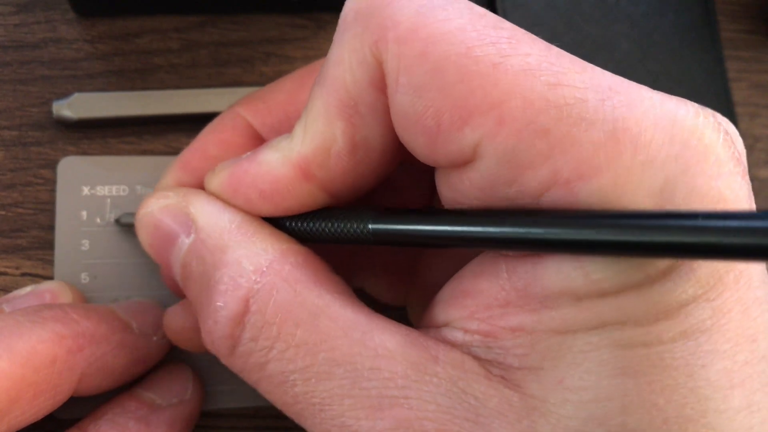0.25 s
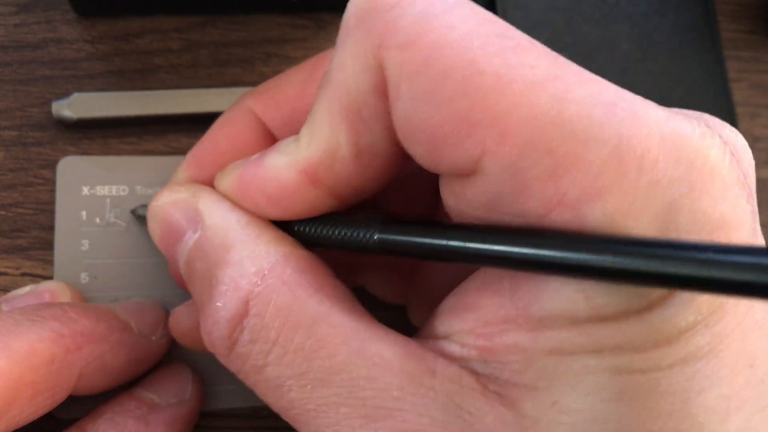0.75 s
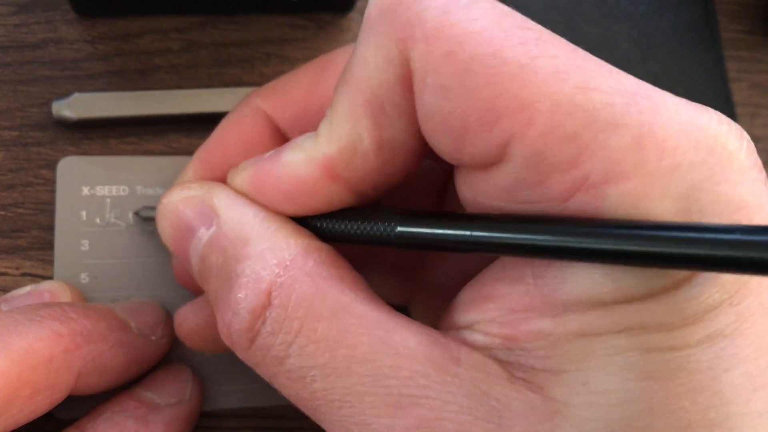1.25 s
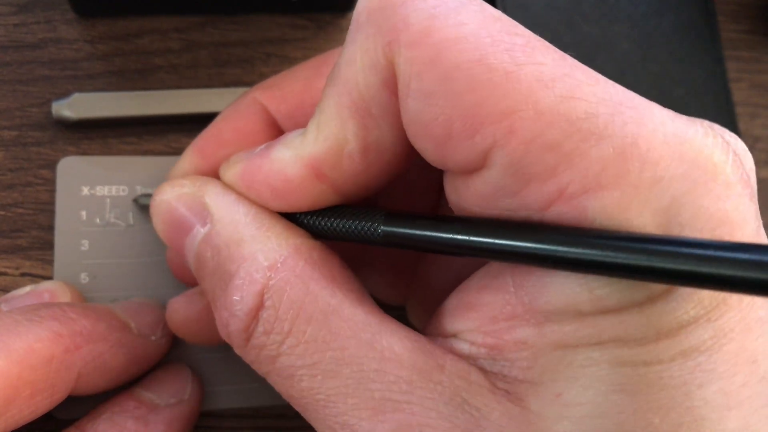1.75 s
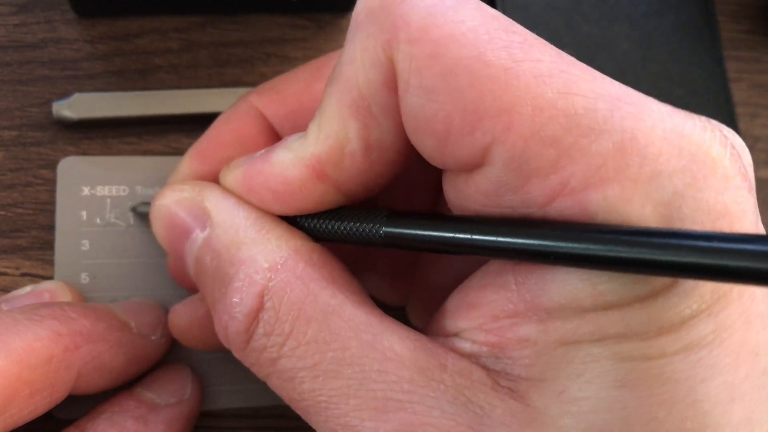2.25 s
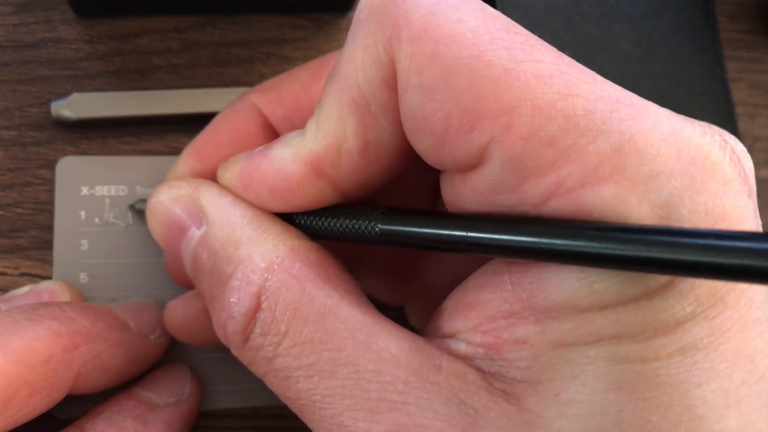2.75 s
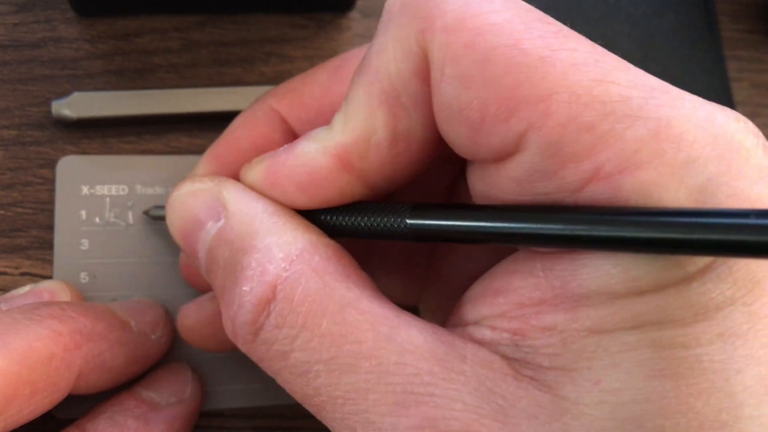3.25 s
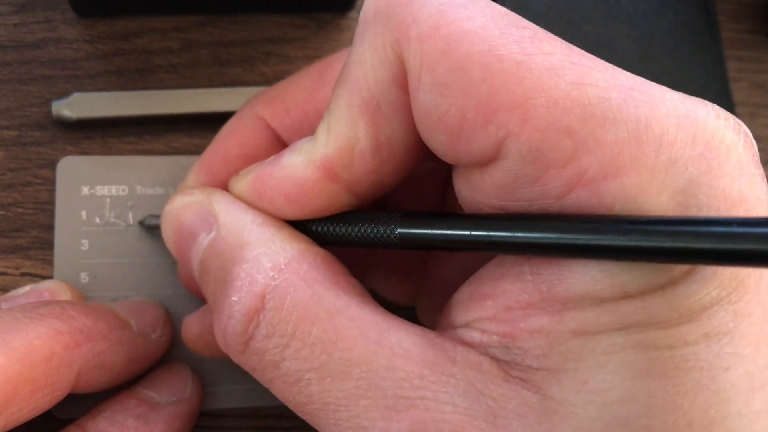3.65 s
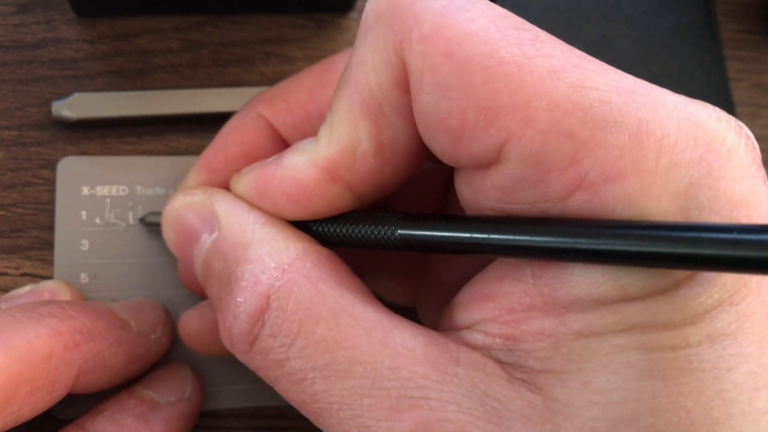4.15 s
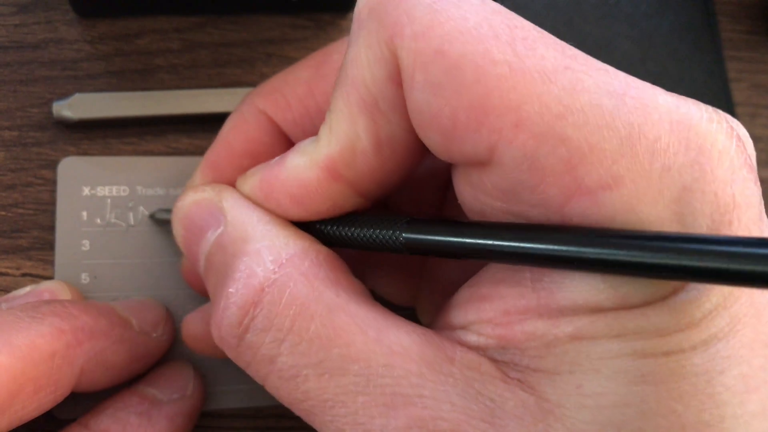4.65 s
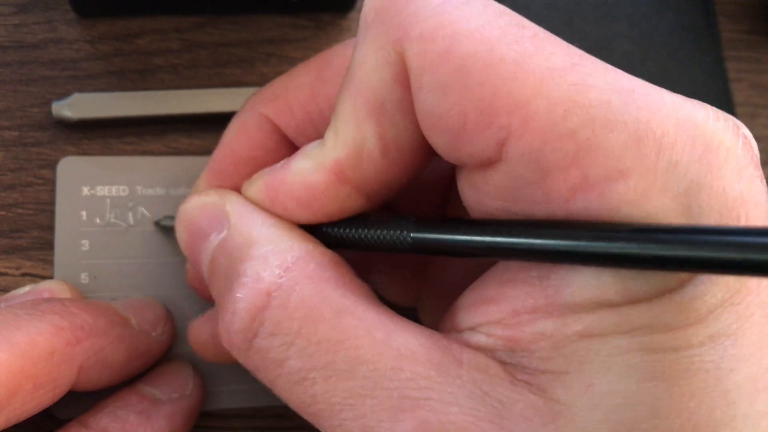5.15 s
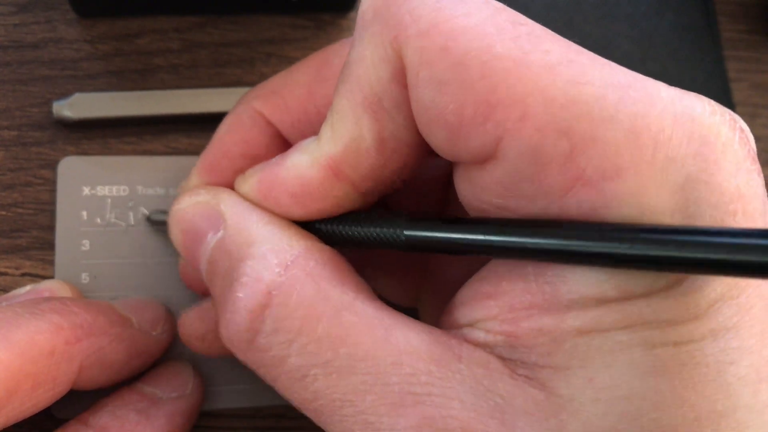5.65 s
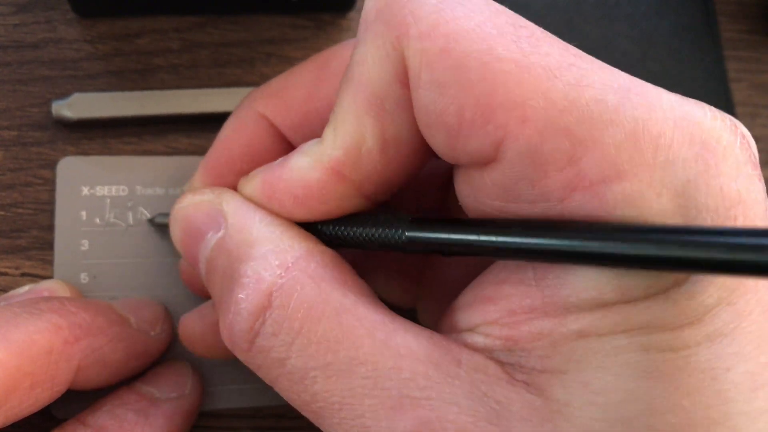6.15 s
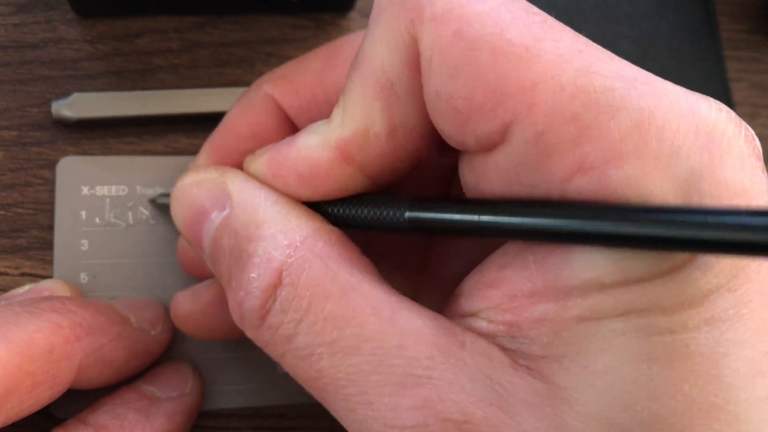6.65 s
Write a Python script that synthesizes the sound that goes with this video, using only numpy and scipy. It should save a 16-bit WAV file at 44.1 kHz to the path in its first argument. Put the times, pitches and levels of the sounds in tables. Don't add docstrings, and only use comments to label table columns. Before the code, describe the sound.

Close, crisp scritching of a hard steel point engraving thin metal, in quick uneven bursts with little clicks and soft desk thumps.

```python
import sys
import numpy as np
from scipy import signal
from scipy.fft import rfft, irfft, next_fast_len
from scipy.io import wavfile
from scipy.ndimage import uniform_filter1d

SR = 44100
rng = np.random.default_rng(int(sys.argv[2]) if len(sys.argv) > 2 else 0)


def amplitude_ratio(level_db):
    exponent = np.asarray(level_db, float) / 20
    return 10 ** exponent


def pcm_store(signal):
    levels = np.round(np.clip(np.atleast_2d(signal), -1, 1) * 32767)
    wavfile.write(sys.argv[1], SR, levels.astype(np.int16).T)


N = 303849

# start_s, length_s, force_db, rod_db
GOUGES = [(0.054, 0.0068, -38, -16.5), (0.386, 0.02, -40.5, -8), (1.706, 0.029, -49.5, -1.5),
          (2.117, 0.015, -45, -7.5), (2.298, 0.031, -47, -5), (2.517, 0.019, -44, -9),
          (2.654, 0.011, -48, -4.5), (2.719, 0.013, -44.5, -5), (2.777, 0.021, -46, 0),
          (3.527, 0.045, -46, -6.5), (3.763, 0.014, -47.5, -7.5), (3.84, .012, -40.5, -8),
          (3.967, 0.02, -48.5, -7), (4.284, 0.026, -49.5, -9), (5.412, 0.029, -43, -11.5),
          (5.527, .047, -33, -9.5), (5.684, 0.031, -39.5, -9.5), (6.046, 0.036, -43, -7.5),
          (6.195, 0.0065, -49.5, -10), (6.553, 0.0068, -59, 1), (6.612, 0.012, -32.5, -9.5)]
# start_s, length_s, force_db, rod_db
STABS = [
    (0.482, 0.012, -42, -14),
    (3.635, .031, -47, -7.5),
    (0.892, 0.0224, -46, 0),
    (4.605, .062, -43, -3.5),
    (5.068, 0.01, -31, -8),
    (5.178, 0.0563, -34, -9.5),
    (5.774, 0.0308, -37.5, -12.5),
    (6.691, 0.028, -45.5, -3),
]
# start_s, length_s, force_db, rod_db
DRAGS = [(0.0, 0.038, -50.5, -12.5), (.084, 0.053, -55.5, -15), (0.259, 0.076, -60.5, -12),
         (.339, 0.031, -52, -7.5), (1.02, 0.034, -40, -6), (1.433, 0.049, -56.5, -10),
         (1.735, 0.073, -57, -5), (1.814, 0.063, -50.5, -10), (2.012, 0.046, -52.5, -1),
         (2.08, 0.05, -56, -4.5), (2.228, 0.04, -50, -4), (2.357, 0.029, -52, -0.5),
         (2.429, .036, -43.5, -11.5), (2.474, 0.042, -54.5, -7), (2.554, 0.067, -59.5, -8),
         (2.833, 0.01, -39, -9.5), (2.852, 0.0072, -37, -12), (2.889, .023, -50.5, -1),
         (3.787, 0.029, -49, -13), (4.075, .031, -57, -9), (4.328, .03, -59, -7),
         (4.809, 0.058, -50.5, -12.5), (4.997, 0.033, -55, -4.5), (5.371, 0.033, -60, -5),
         (5.805, 0.027, -55.5, -8), (6.282, .017, -49.5, -7.5), (6.39, 0.048, -57.5, -7.5),
         (6.522, 0.046, -66, -4.5), (6.723, 0.019, -51.5, -21), (6.889, .018, -54, 1)]
# start_s, force_db, rod_db
SNAGS = [(.109, -46, -15), (.146, -40.5, -11.5), (.254, -61, -3), (.334, -46.5, -11), (0.96, -56.5, 2),
         (1.054, -51, -1), (1.508, -50, -7), (1.537, -53.5, -1.5), (1.562, -47, -2), (1.578, -48.5, -1),
         (1.591, -43, -6.5), (1.692, -51.5, -1), (2.003, -58, 1), (2.163, -56.5, 1), (2.217, -38, -6.5),
         (2.27, -43, 0), (2.34, -50.5, 0), (2.35, -39.5, -2), (2.412, -50.5, -8), (3.394, -51, -7),
         (3.831, -32.5, -4), (4.328, -49, -4.5), (4.611, -46, -12), (4.851, -48.5, -14), (4.876, -50.5, -9),
         (5.507, -45, -14), (5.718, -48, -6), (6.096, -35, -9.5), (6.313, -48.5, -12), (6.638, -53, 4)]
# start_s, length_s, force_db
GRAZES = [(0.157, 0.012, -57), (.462, 0.014, -62), (0.87, .02, -52), (0.932, 0.013, -56),
          (1.889, 0.013, -58.5), (2.158, 0.037, -61.5), (2.945, 0.021, -63.5), (3.328, 0.0031, -72),
          (3.493, 0.014, -53), (3.6, 0.0037, -67), (4.666, 0.013, -49.5), (5.036, 0.027, -50),
          (4.581, 0.028, -56), (5.088, .014, -57), (5.415, 0.0033, -49), (5.163, 0.011, -51.5),
          (5.29, .005, -58), (5.59, 0.0059, -64), (6.225, 0.0078, -60), (6.378, 0.0066, -63),
          (6.74, 0.025, -60), (6.772, 0.0052, -51)]
# start_s, peak_db, brightness_db, desk_thump_db
TAPS = [(0.487, -28.5, -13, -14), (0.719, -22.5, -5.5, -21), (0.821, -47, 4, -23), (1.164, -29, 3, -26),
        (2.949, -44.5, -8, -10), (3.02, -37.5, 5.5, -17), (3.079, -40.5, -1, -23),
        (3.384, -28.5, -4.5, -19.5), (4.26, -39, -2, -36), (4.705, -40, 2, -14), (4.809, -33, -24, -21),
        (4.99, -45.5, 5, -25), (5.304, -40, 6.5, -28), (5.767, -34.5, -10, -5.5),
        (5.977, -26.5, -20, -18.5), (6.284, -34.5, -4, -20), (6.862, -27, -19, -24)]
# time_s, level_db
UPRIGHT = [(0, 0), (.3, -0.5), (.9, 1), (1.5, -3), (2.3, -1), (2.6, -1), (3.0, 3), (3.6, 5.5), (4.1, -2),
           (4.85, -1.5), (5.2, -4), (5.45, -6), (6.1, 4), (6.9, -6.5)]
# time_s, level_db
HAND_WEIGHT = [(0, 0), (.42, 4.5), (.9, -7), (1.1, -11.5), (1.6, -3), (1.86, 3), (2.27, -1), (2.45, -3.5),
               (2.9, -1), (3.6, -10), (3.85, -12), (4.11, -2), (4.6, -8), (4.87, 5.5), (5.4, -5.5),
               (5.6, 1), (6.1, -2.5), (6.7, -8)]
# time_s, share_lost_0_to_1, spared_below_hz
DROPOUTS = [(.125, .88, 2500), (.36, .5, 1000), (.469, .97, 2900), (1.04, .9, 900), (1.106, .75, 2900),
            (1.34, .9, 2900), (1.442, .97, 1000), (1.458, .97, 1000), (1.788, .7, 900), (1.96, .8, 900),
            (2.448, .7, 900), (2.757, .85, 1500), (3.13, .75, 2500), (3.218, .97, 900), (3.234, .97, 900),
            (3.881, .65, 2900), (4.093, .7, 2900), (4.219, .7, 2900), (4.833, .93, 2000),
            (4.945, .93, 2500), (5.053, .97, 2000), (5.225, .85, 2000), (5.61, .65, 2500),
            (5.824, .6, 2000), (6.16, .75, 2000), (6.417, .82, 2900)]
# mode_hz, width_hz, level_db
PLATE = [(432.7, 47, 1), (591, 63, -4.5), (745, 59, -5.5), (937, 173, -4), (1145, 64, -7), (1328, 106, -3),
         (1484, 127, -3), (1695, 117, -5), (2042, 59, -8), (2418, 140, -9.5), (2542, 116, -7.5),
         (3470, 1050, -22)]
ROD = [(3500, 270, -23), (4320, 200, -8.5), (4716, 114, 3.5), (5044, 110, 3.5), (6070, 1250, -8.5),
       (8820, 270, -6.5), (8646, 900, -5.5), (9420, 830, -2.5)]
TIP = [(11290, 160, -3), (13850, 1100, 4), (13550, 100, -9), (15100, 340, -7)]
DESK = [(59, 18, -3), (115.9, 18, 3.5), (131.5, 50, -1), (220.6, 51.8, 2), (245.7, 37.4, 0),
        (296.7, 30, -9.5)]
LANDING = [(454, 56, 3.5), (593, 210, -2.5), (1355, 570, -2), (2540, 163, -4), (3360, 670, -12.5)]
# freq_hz, level_db
TICK = [(1760, -28), (3000, -3.5), (4100, -17.5), (4810, 0.5), (7250, -8.5), (13700, -9), (15800, 7)]
# freq_hz, t60_s
ROOM = [(100, 0.38), (1000, 0.29), (4000, 0.37), (16000, 0.15)]
# freq_hz, density_db_per_hz
HUSH = [(18, -74), (30, -1.5), (81, -6), (108, -36), (294, -18), (931, -27.5), (1340, -24.5), (3190, -32),
        (4980, -35.5), (7200, -36.5), (10100, -39), (12500, -35.5), (15800, -40)]
HUSH_DB = -66

SNAG_S, GRAZE_ROD_DB = 0.0061, -10
LEAD_S, LEAD_DB, TRAIL_S, TRAIL_DB, SHOULDER_ROD_DB = 0.02, -15, 0.018, -16, 4.5
SLIPS_PER_S, SLIP_SPREAD_DB, SLIP_S = 450, 4, 0.00045
RUB, EVENING = 0.25, 0.6
SMOOTH_FROM_DB, SMOOTH_PER_DB = -57, 0.06
BLUR = 0.68
CLAMP_FROM_DB, CLAMP_DB_PER_DB = -45.5, 0.33
LOW_PLATE_DB, HIGH_PLATE_DB, LOW_ROD_DB, HIGH_ROD_DB = -4, -1.5, -2, -3
UPRIGHT_SHARE = 0.58
WANDER_DB, DETUNE = 4.5, 0.025
ROCK_S, SETTLE_S, EARLY_S = 0.0017, 0.029, 0.016
TAP_PUSH_DB, REST_DB, JOLT_DB = 1.5, -69.5, 21
SOFT_LIMIT, EDGE_HZ = 0.11, 15750


def evened(x):
    return x / np.sqrt(np.mean(x ** 2) + 1e-20)


def read(points, hz):
    f, value = np.transpose(points)
    return np.interp(np.log(hz + 1), np.log(f + 1), value)


def over_time(points):
    return np.interp(np.arange(N) / SR, *np.transpose(points))


def add(mix, start_s, sound):
    part = mix[max(round(start_s * SR), 0):][:len(sound)]
    part += sound[:len(part)]


def shaped(x, db_of):
    size = next_fast_len(len(x))
    gain = amplitude_ratio(db_of(np.fft.rfftfreq(size, 1 / SR)))
    return irfft(rfft(x, size) * gain, size)[:len(x)]


def body(modes):
    narrowest_hz = min(width_hz for _, width_hz, _ in modes)
    t = np.arange(0, 2.5 / narrowest_hz, 1 / SR)
    response = np.zeros(len(t))
    for k, (hz, width_hz, db) in enumerate(modes):
        decay = np.exp(-np.pi * width_hz * t)
        response += (-1) ** k * amplitude_ratio(db) * width_hz * decay * np.sin(2 * np.pi * hz * t)
    return response / np.linalg.norm(response)


def ring(force, modes):
    turn = np.cumsum(8 + 400 * uniform_filter1d(rng.standard_normal(N), 4000)) / SR
    out = np.zeros(N)
    versions = rng.standard_normal((3, len(modes)))
    for k, shifts in enumerate(versions - versions.mean(0)):
        share = np.sqrt(2 / 3) * np.cos(np.pi * (turn + k / 3))
        weighted = [(hz * (1 + DETUNE * v), width_hz, db + WANDER_DB * u)
                    for (hz, width_hz, db), u, v in zip(modes, shifts, shifts[::-1])]
        drive = share * force * rng.standard_normal(N)
        out += signal.oaconvolve(drive, body(weighted))[:N]
    return out


def strokes():
    rows = GOUGES + STABS + DRAGS
    rows += [(s, SNAG_S, db, rod) for s, db, rod in SNAGS]
    rows += [(*row, GRAZE_ROD_DB) for row in GRAZES]
    rows += [(s - LEAD_S, LEAD_S, db + LEAD_DB, rod + SHOULDER_ROD_DB) for s, _, db, rod in GOUGES]
    rows += [(s + length, TRAIL_S, db + TRAIL_DB, rod + SHOULDER_ROD_DB)
             for s, length, db, rod in GOUGES + STABS]
    return rows


def grit():
    size_db = SLIP_SPREAD_DB * np.minimum(rng.exponential(1, N), 3.5)
    impulses = amplitude_ratio(size_db) * (rng.random(N) < SLIPS_PER_S / SR)
    t = np.arange(600) / SR
    burst = (t / SLIP_S) ** 2 * np.exp(-1.5 * t / SLIP_S)
    slips = RUB + evened(signal.oaconvolve(impulses, burst)[:N])
    return slips / np.sqrt(uniform_filter1d(slips ** 2, 900)) ** EVENING


def scratching():
    bite, loose, slide = np.zeros((3, N))
    slips = grit()
    for start_s, length_s, force_db, rod_db in strokes():
        part = slips[max(round(start_s * SR), 0):][:round((length_s + 0.002) * SR)]
        press = amplitude_ratio(force_db) * signal.windows.tukey(len(part), min(0.0042 / length_s, 1))
        clamp_db = -CLAMP_DB_PER_DB * max(force_db - CLAMP_FROM_DB, 0)
        roughness = np.clip(1 - SMOOTH_PER_DB * (force_db - SMOOTH_FROM_DB), 0.3, 1.2)
        add(bite, start_s - 0.001, press * evened(part ** BLUR))
        add(loose, start_s - 0.001, press * evened(np.sqrt(part)) * amplitude_ratio(clamp_db))
        add(slide, start_s - 0.001, press * evened(part ** roughness) * amplitude_ratio(rod_db))
    upright_db = over_time(UPRIGHT)
    desk = amplitude_ratio(-7.5) * ring(loose, DESK)
    plate = ring(loose * amplitude_ratio(LOW_PLATE_DB), PLATE[:4])
    plate += ring(bite * amplitude_ratio(HIGH_PLATE_DB), PLATE[4:])
    rod = ring(slide * amplitude_ratio(LOW_ROD_DB), ROD[:5])
    rod += ring(slide * amplitude_ratio(HIGH_ROD_DB + UPRIGHT_SHARE * upright_db), ROD[5:])
    tip = ring(slide * amplitude_ratio(upright_db), TIP)
    return plate + rod + tip + desk


def leaning():
    push = np.zeros(N)
    tap_pushes = [(s + EARLY_S, ROCK_S, db + TAP_PUSH_DB, 0) for s, db, *_ in TAPS]
    for start_s, length_s, db, _ in strokes() + tap_pushes:
        add(push, start_s - EARLY_S, np.full(round(length_s * SR), amplitude_ratio(db)))
    t = np.arange(SR // 4) / SR
    rock = (1 - np.exp(-t / ROCK_S)) * np.exp(-t / SETTLE_S)
    sway = signal.oaconvolve(push * amplitude_ratio(over_time(HAND_WEIGHT)), rock / rock.sum())[:N]
    jolt = signal.oaconvolve(np.gradient(sway), body(DESK))[:N]
    rumble = ring(amplitude_ratio(-3.0) * sway + amplitude_ratio(REST_DB), DESK)
    return rumble + amplitude_ratio(JOLT_DB) * jolt


def hush():
    return amplitude_ratio(HUSH_DB) * evened(shaped(rng.standard_normal(N), lambda hz: read(HUSH, hz)))


def room(x):
    hz, t, z = signal.stft(rng.standard_normal(SR // 2), SR, nperseg=256)
    decay = amplitude_ratio(-60 * t / read(ROOM, hz)[:, None])
    tail = signal.istft(z * decay, SR, nperseg=256)[1]
    delayed = np.r_[np.zeros(150), tail / np.linalg.norm(tail)]
    return signal.oaconvolve(x, delayed)[:N]


def landings():
    out = np.zeros(N)
    t = np.arange(400) / SR
    thump = body(DESK[1:])
    dusts = rng.standard_normal((len(TAPS), 400))
    for (start_s, peak_db, bright_db, thump_db), dust in zip(TAPS, dusts):
        tick = shaped(dust, lambda hz: read(TICK, hz) - 30 * (hz < 2300)) * np.exp(-t / 0.0012)
        blow = np.hanning(10.0 + round(-0.7 * min(bright_db, 0)))
        modes = [(hz, width_hz, db + 1.45 * u) for (hz, width_hz, db), u in zip(LANDING, dust)]
        knock = np.convolve(blow, body(modes))
        knock /= abs(knock).max()
        snap = np.gradient(knock)
        add(out, start_s + 0.00035, amplitude_ratio(peak_db + bright_db + 6.5) * tick / abs(tick).max())
        add(out, start_s + 0.00046, amplitude_ratio(peak_db - 12.0) * snap / abs(snap).max())
        add(out, start_s + 0.001416, -amplitude_ratio(peak_db + 0.5) * knock)
        add(out, start_s + 0.0035, amplitude_ratio(peak_db + thump_db + 5.0) * thump / abs(thump).max())
    return out


def scene():
    near = scratching() + landings()
    return (near + amplitude_ratio(-17) * room(near) + leaning() + hush())[None]


def dropped_out(x):
    size = 1400
    lost = np.zeros(N)
    hz = np.fft.rfftfreq(size, 1 / SR)
    for time_s, share, spared_hz in DROPOUTS:
        z = rfft((x - lost)[round(time_s * SR) - size // 2:][:size] * np.hanning(size) ** 0.65)
        level = uniform_filter1d(abs(z), size=5) * hz ** 0.65
        exposed = hz > spared_hz
        threshold = np.percentile(level[exposed & (hz < EDGE_HZ)], 86)
        weak = exposed & (level < threshold)
        add(lost, time_s - size / 2 / SR, share * irfft(z * weak))
    return lost


def top_cut(x):
    return signal.sosfilt(signal.butter(12, 16650, fs=SR, output="sos"), x)


def record(dry):
    x = SOFT_LIMIT * np.tanh(dry / SOFT_LIMIT)
    x = signal.sosfilt(signal.butter(2, 38, "high", fs=SR, output="sos"), x)
    lowpass = signal.firwin(511, EDGE_HZ, window=("kaiser", 9), fs=SR)
    x = signal.oaconvolve(x, lowpass[None], "same")
    mix = x - dropped_out(x[0])
    return top_cut(mix)


dry = scene()
out = record(dry)
pcm_store(out)
```